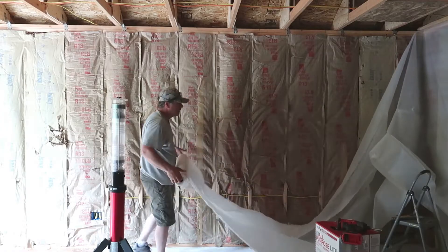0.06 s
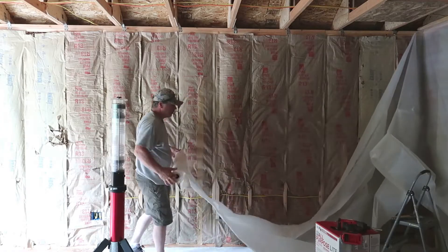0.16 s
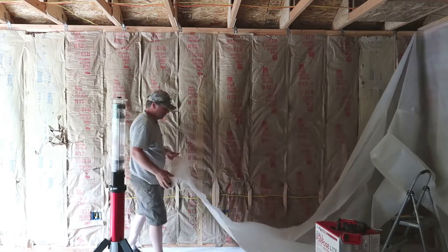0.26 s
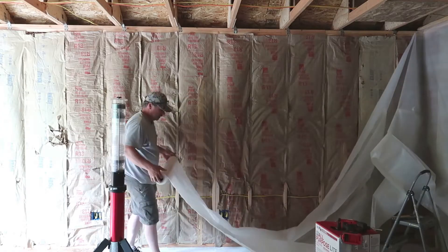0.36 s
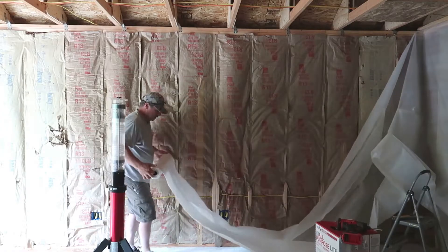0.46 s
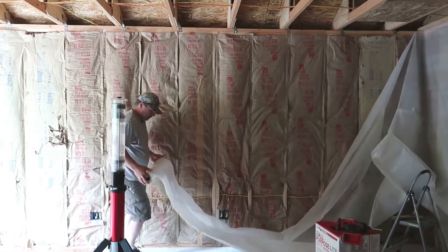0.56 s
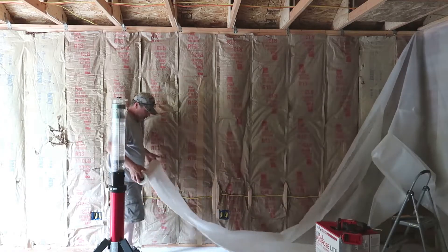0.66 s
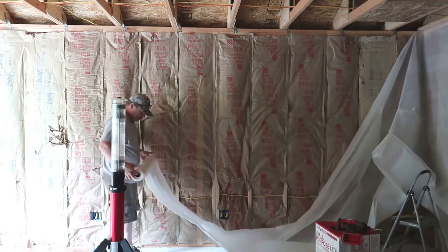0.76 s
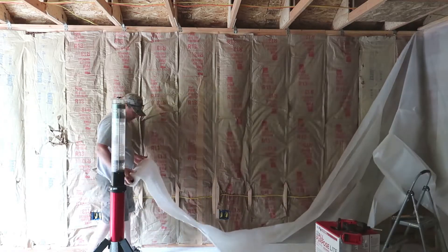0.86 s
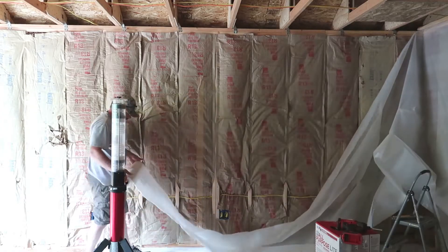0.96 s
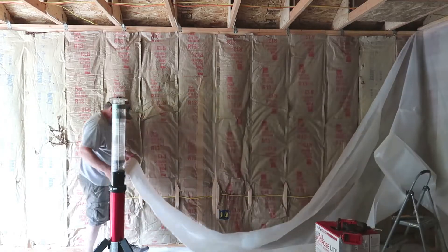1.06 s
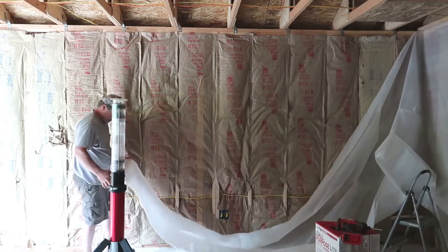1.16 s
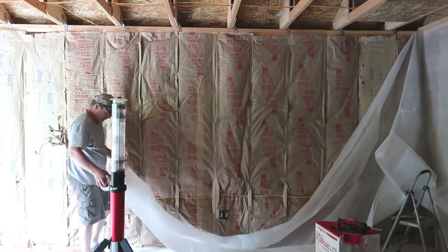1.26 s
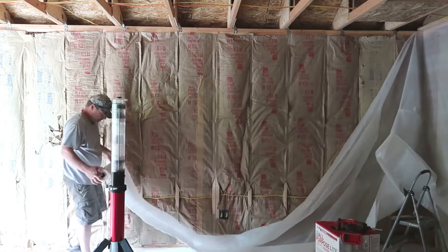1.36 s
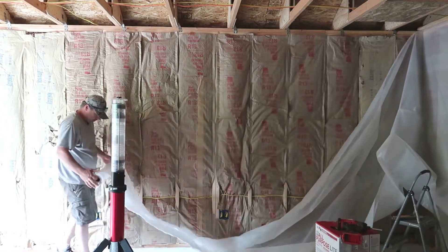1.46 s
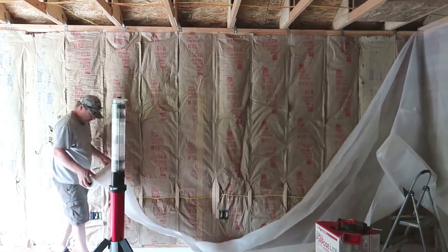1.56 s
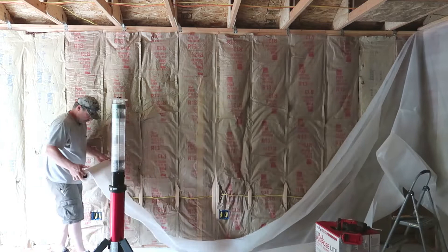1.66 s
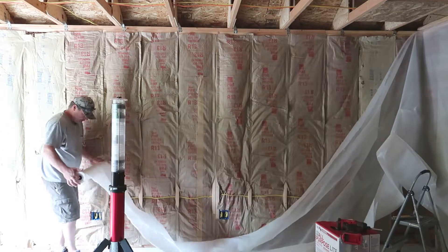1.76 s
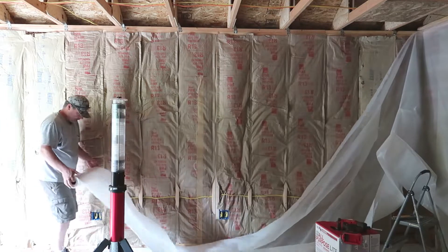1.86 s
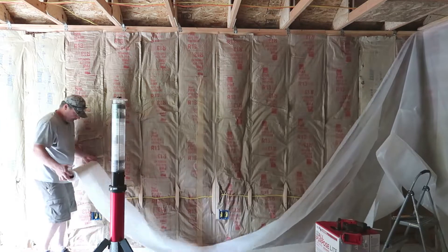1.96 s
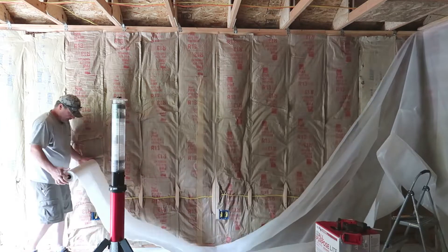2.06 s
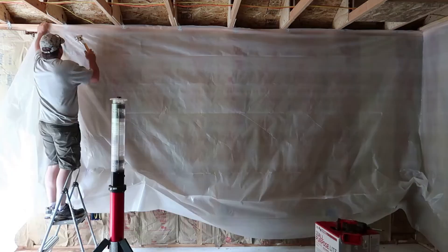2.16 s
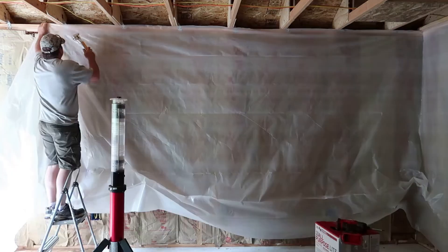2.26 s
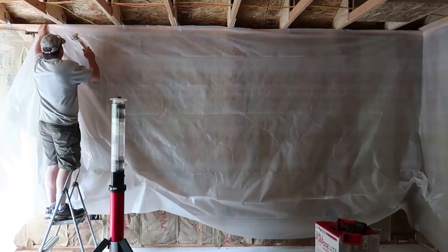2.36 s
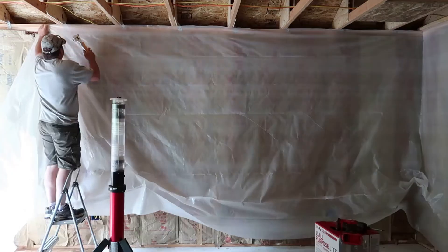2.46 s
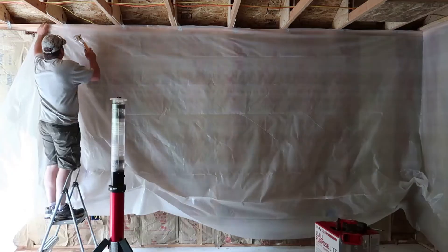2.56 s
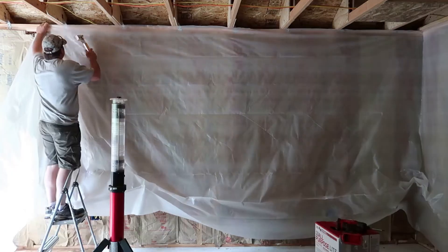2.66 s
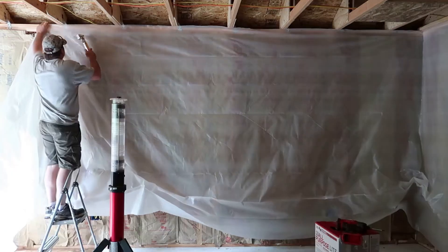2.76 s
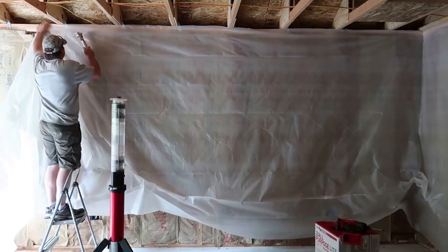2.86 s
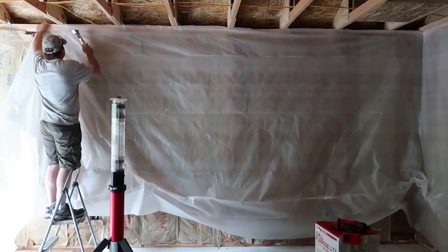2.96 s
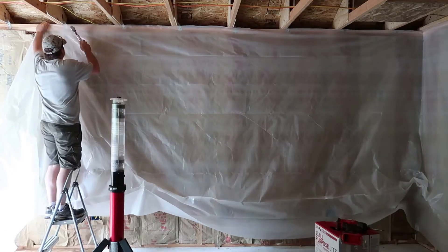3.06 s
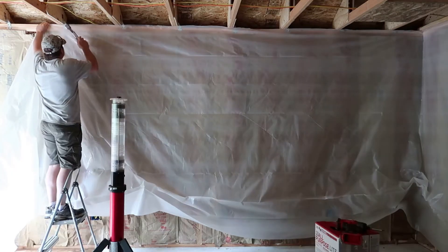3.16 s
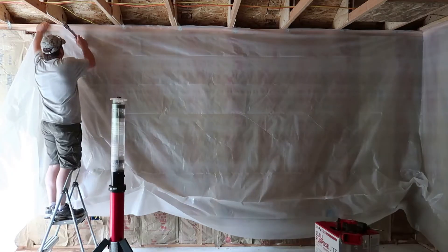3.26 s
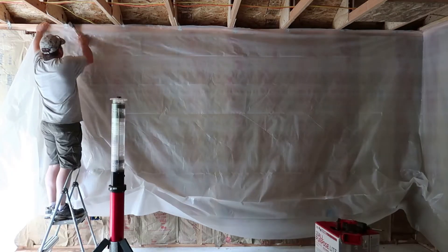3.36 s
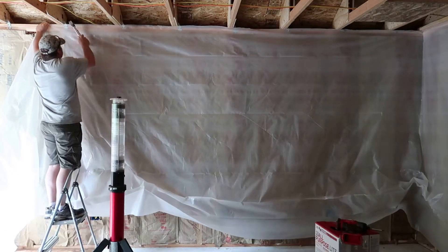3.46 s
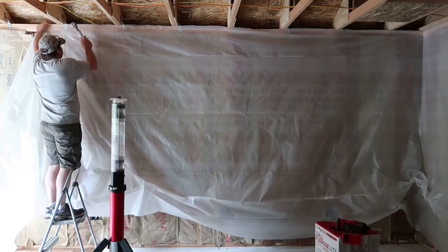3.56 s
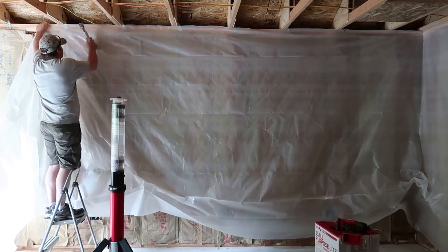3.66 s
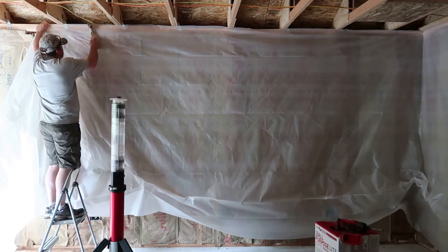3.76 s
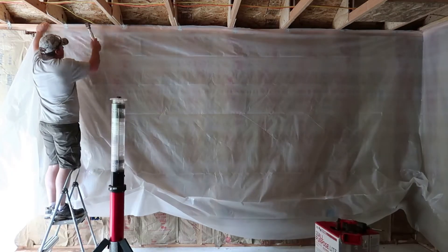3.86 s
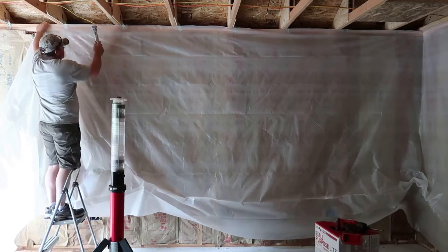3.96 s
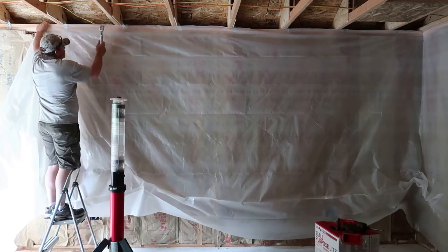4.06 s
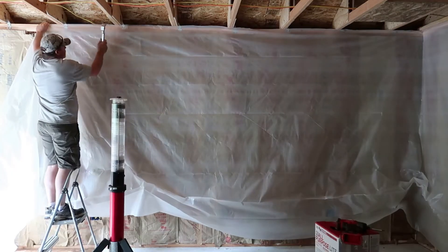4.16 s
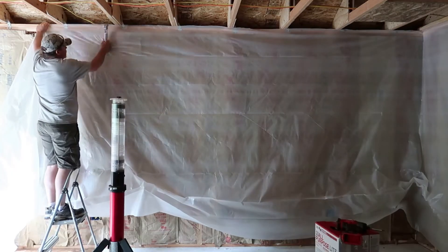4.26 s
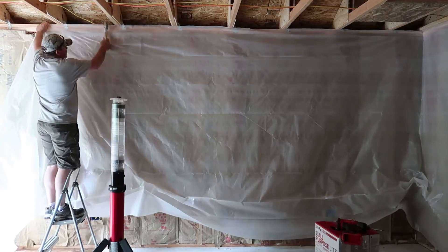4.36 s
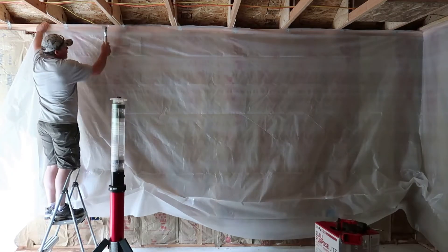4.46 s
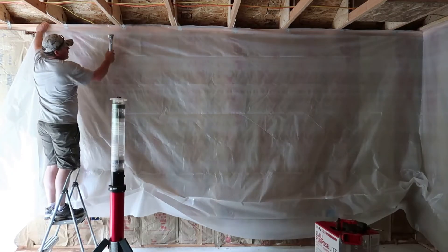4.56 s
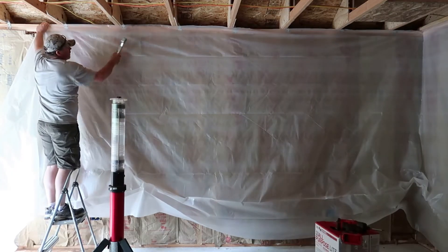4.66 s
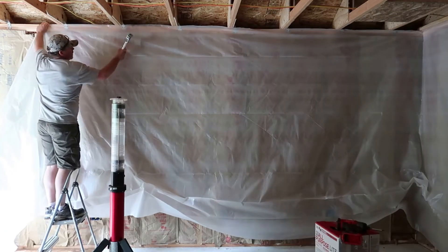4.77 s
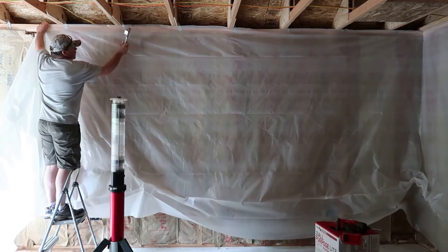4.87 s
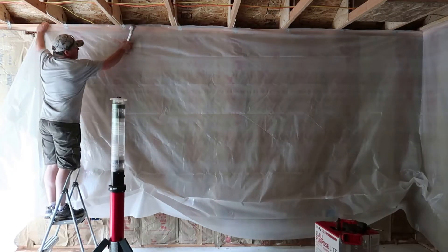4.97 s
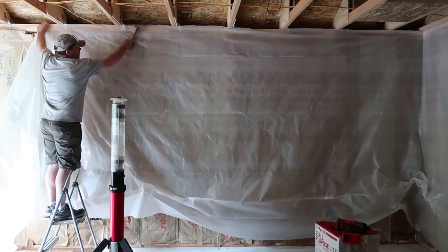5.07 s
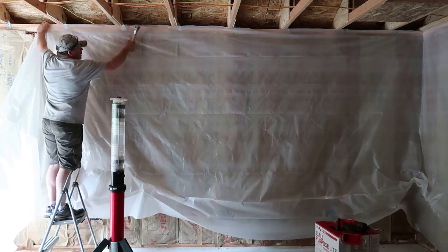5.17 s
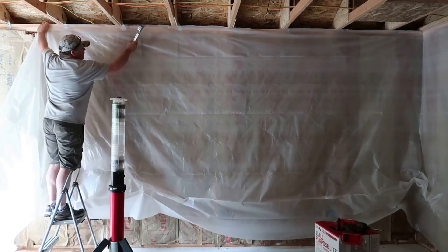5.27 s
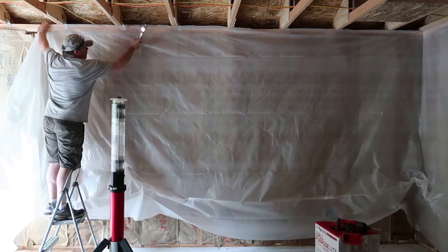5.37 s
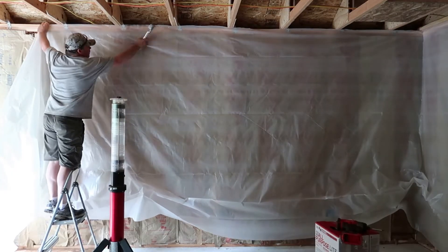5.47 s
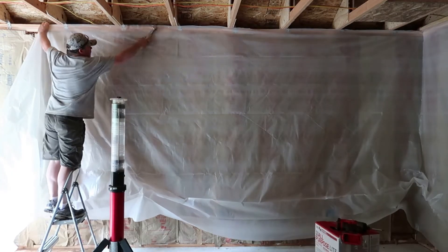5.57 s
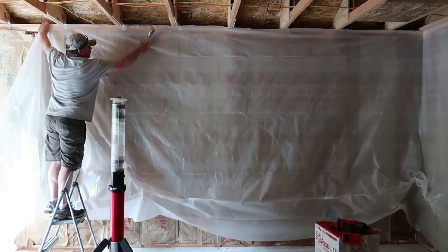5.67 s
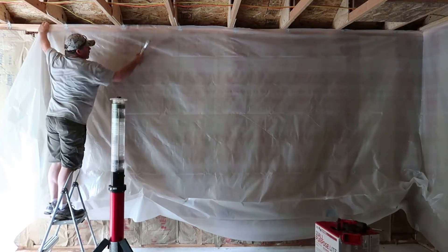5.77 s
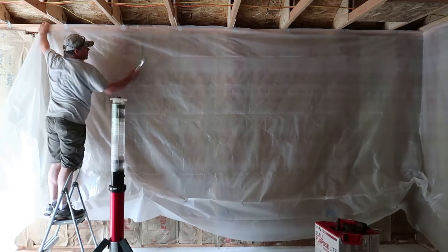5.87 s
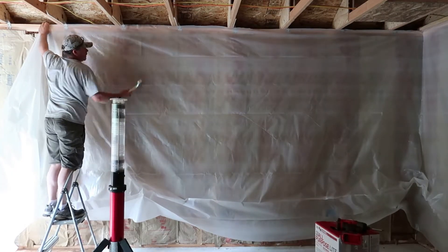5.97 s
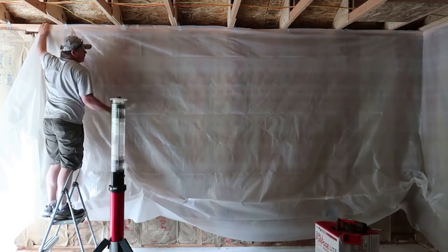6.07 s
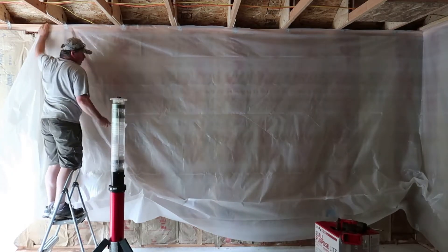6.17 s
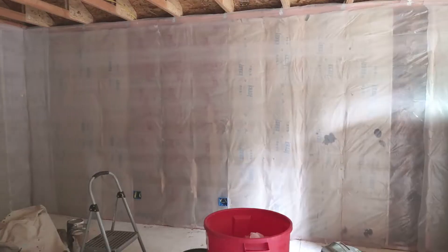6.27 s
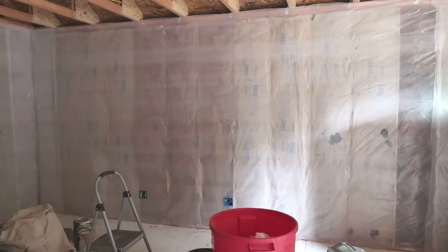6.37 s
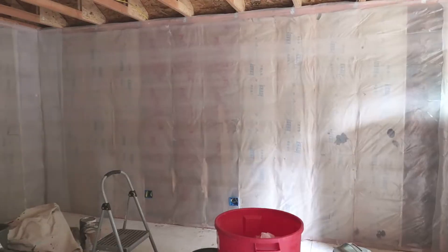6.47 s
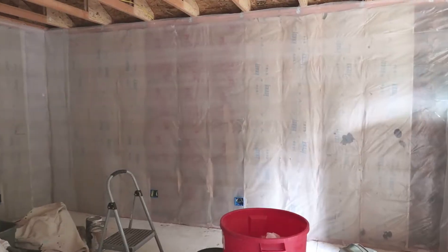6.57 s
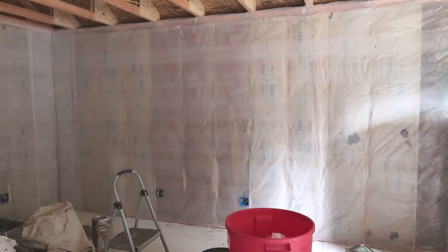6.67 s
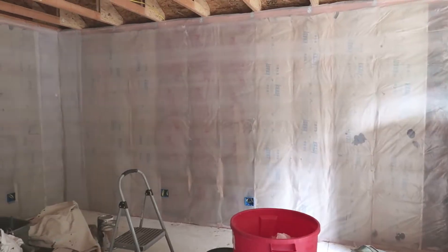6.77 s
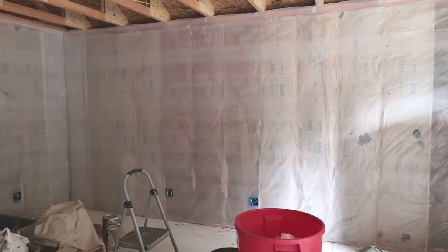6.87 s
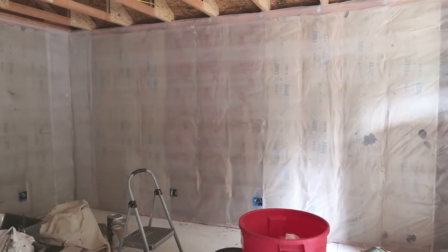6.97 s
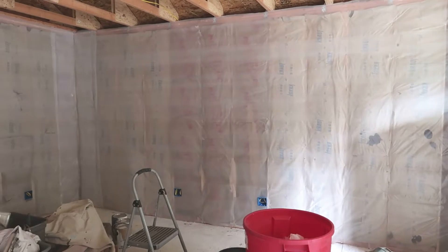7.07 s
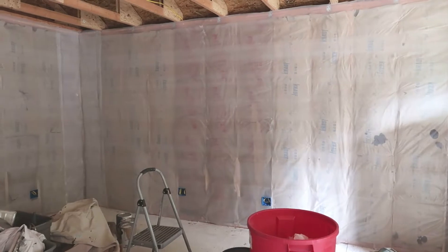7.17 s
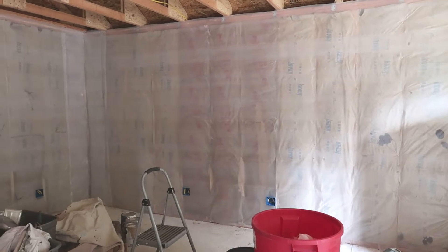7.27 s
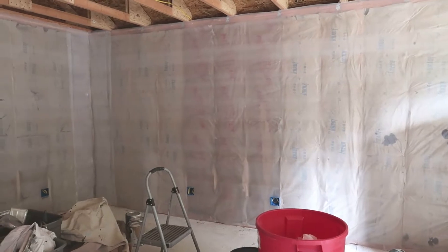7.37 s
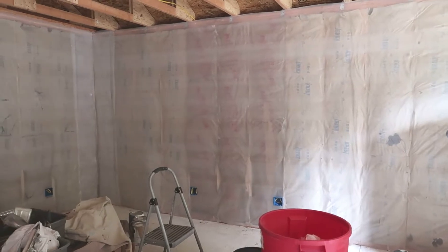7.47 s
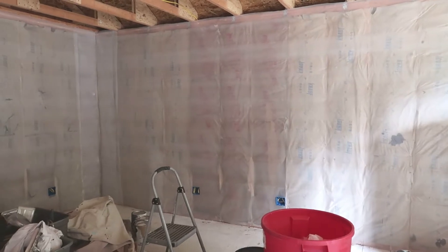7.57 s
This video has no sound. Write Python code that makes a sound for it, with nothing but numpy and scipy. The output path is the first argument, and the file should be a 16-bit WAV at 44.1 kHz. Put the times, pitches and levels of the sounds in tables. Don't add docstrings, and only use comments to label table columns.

```python
import sys
import numpy as np
from scipy import signal
from scipy.io import wavfile
from scipy.ndimage import uniform_filter1d

SR = 44100
rng = np.random.default_rng(int(sys.argv[2]) if len(sys.argv) > 2 else 0)


def dump_mix(stems):
    frames = np.atleast_2d(stems).T
    limited = np.clip(frames, -1, 1)
    pcm = np.round(limited * 32767).astype(np.int16)
    wavfile.write(sys.argv[1], SR, pcm)


def elevation(decibels):
    levels = np.asarray(decibels, float)
    return 10 ** (levels / 20)


N = 336042
MOVE_S = 6.207
CUTOFF_HZ = 15900

# t/s, peak level/dB, crack level/dB re peak, brush before the blow/s, echo level/dB re peak
STAPLER_BLOWS = [
    (3.419, 0, -15, 0.038, -20),
    (3.809, -8.5, -18, 0.02, -15.5),
    (4.384, -9.5, -18, 0.046, -14),
    (5.095, -7, -15.5, 0.053, -14),
    (5.589, -8, -15.5, 0.045, -12),
]
# f/Hz, t60/s
REVERBERATION = [(60, 0.7), (160, 0.22), (420, 0.27), (1100, 0.22), (2910, 0.39), (7680, 0.39)]
# f/Hz, correlation
ROOM_CORRELATION = [(60, .999), (200, 1), (700, .98), (2400, .85), (4400, 0.4), (7000, 0.25), (15000, 0.32)]


def rms_one(x):
    return x / np.sqrt(np.mean(x ** 2) + 1e-20)


def at_hz(points, hz):
    points = np.array(points)
    return np.interp(np.log(hz), np.log(points[:, 0]), points[:, 1])


def drift(rate, size):
    r = np.exp(-80 * np.pi * rate / SR)
    noise = rng.standard_normal(size // 40 + 2002)
    slow = signal.lfilter([1], [1, -2 * r, r * r], noise)[2000:]
    return np.interp(np.arange(size) / 40, np.arange(len(slow)), rms_one(slow))


def ring(clicks, hz, t60):
    r, w = elevation(-60 / (t60 * SR)), 2 * np.pi * hz / SR
    return signal.lfilter([0, np.sin(w)], [1, -2 * r * np.cos(w), r * r], clicks + 1e-18)


def add(out, s, sound):
    i = round(s * SR)
    out[..., i:i + sound.shape[-1]] += sound[..., :N - i]


def hiss(size):
    return rng.standard_normal((2, 2, size))


def bank(source, spectrum, alike, shape, count=19):
    out, edges = 0, np.geomspace(22, 15930, count + 1)
    for k, (low, high) in enumerate(zip(edges, edges[1:])):
        hz = np.sqrt(low * high)
        if spectrum[0][0] < high and low < spectrum[-1][0]:
            band_filter = signal.butter(2, [low, high], "band", fs=SR, output="sos")
            mid, side = signal.sosfilt(band_filter, source[k % 2])
            c = np.clip(at_hz(alike, hz), -1, 1)
            stereo = np.sqrt(1 + c) * mid + np.sqrt(1 - c) * side * [[1], [-1]]
            out = out + elevation(at_hz(spectrum, hz)) * shape(hz) * stereo
    return rms_one(out)


def tugs(rows, t):
    s, db, rise, fall, bright_db = np.transpose(rows)[:, :, None]
    power = elevation(2 * db - 20 * np.maximum((s - t) / rise, (t - s) / fall))
    return power.sum(axis=0), (power * bright_db).sum(axis=0)


def sheet(per_s=2500, spread_db=3.0, smooth=1.0, patchy_db=2.0, clump_db=0.5):
    # f/Hz, density/dB per Hz
    crackle_spectrum = [(150, -33.5), (250, -5), (330, -9), (385, -6), (450, 1.5), (525, -5.5), (692, -2),
                        (2600, -3), (9390, -20.5), (12600, -27), (15500, -37.5)]
    # f/Hz, density/dB per Hz
    billow_spectrum = [(13, -36), (22, -8), (123, -1), (189, 0), (247, -11.5), (287, -8), (350, -3.5),
                       (460, -43.5), (770, -120)]
    # f/Hz, left-right correlation
    sheet_correlation = [(60, 1), (200, 0.9), (700, 0.99), (2400, 0.97), (4400, 0.66), (7000, 0.4),
                         (15000, 0.23)]
    # t/s, crackle level/dB, rise/s per 10 dB, fall/s per 10 dB, treble level/dB
    tugs_near = [(0.03, -40, 0.083, .09, -2), (0.195, -35, 0.071, .08, -3), (0.38, -40.5, 0.022, .1, 5),
                 (0.49, -32.5, 0.082, .07, -1), (0.7, -42.5, 0.044, .04, -2.5),
                 (0.8, -37, 0.091, .12, -0.5), (0.93, -43, 0.13, .15, 3.5), (1.14, -34.5, 0.09, .1, 0),
                 (1.31, -43, .02, .04, -6.5), (1.435, -33, 0.03, .11, 0), (1.57, -46, .1, .2, -4.5),
                 (1.77, -36.5, .07, .13, -1), (2.04, -38, 0.052, .18, 1)]
    tugs_far = [(2.22, -48, 0.093, 0.062, 1.5), (2.285, -49.5, 0.016, 0.094, 7),
                (2.44, -47.5, 0.11, 0.14, 5), (2.53, -46.5, 0.085, 0.35, 2.5), (2.8, -50, 0.022, 0.087, 0),
                (2.91, -51, 0.21, 0.1, 3), (3.07, -56.5, .15, 0.044, 0), (3.2, -65, 0.026, .05, 0),
                (3.258, -61.5, .008, .07, 8)]
    step_up_s = 2.112
    slide_db, slide_bright_db = -50.5, 0.5
    billow_db, billow_follows = -50, 0.55

    size = round(3.42 * SR)
    t, slide = np.arange(size) / SR, elevation(2 * slide_db)
    near, near_bright = tugs(tugs_near, t)
    far, far_bright = tugs(tugs_far, t)
    is_near = t < step_up_s
    power = np.where(is_near, near + slide, far)
    crackle_db = 10 * np.log10(power)
    tilt_db = np.where(is_near, near_bright + slide * slide_bright_db, far_bright) / power

    born = rng.random(size) < per_s * elevation(4 * drift(25, size)) / SR
    heights = elevation(spread_db * np.minimum(rng.exponential(1, size), 5))
    clicks = rms_one(born * heights * rng.choice([-1, 1], size))
    source = clicks * [[1], [-.3]] + smooth * hiss(size) * [[1], [1.5]]
    clumps = drift(39, size)

    def shape(hz):
        treble = np.clip(np.log2(hz / 2500), 0, 1)
        return elevation(clump_db * clumps + patchy_db * drift(15.0, size) + tilt_db * treble)

    def billow_shape(hz):
        return elevation(3 * drift(15, size))

    crackle = elevation(crackle_db + 1.5) * bank(source, crackle_spectrum, sheet_correlation, shape, count=32)
    billow = bank(hiss(size), billow_spectrum, sheet_correlation, billow_shape)
    out = np.zeros((2, N))
    add(out, 0, crackle + elevation(billow_db + billow_follows * (crackle_db + 43)) * billow)
    return out


def small_hits(rows, cycles, crack_s, crack_db):
    out, t = np.zeros(N), np.arange(round(.08 * SR)) / SR
    for s, db, hz, *bright_db in rows:
        burst = rng.standard_normal(len(t)) * np.exp(-t / crack_s)
        body = ring(burst, hz, cycles / hz)
        crack = elevation(crack_db + sum(bright_db)) * np.diff(burst, prepend=0)
        add(out, s, elevation(db) * (body / np.abs(body).max() + crack))
    return out


def snaps():
    # t/s, peak level/dB, f/Hz
    fold_pops = [
        (0.153, -28.5, 1730),
        (0.367, -35, 466),
        (0.675, -26.5, 1680),
        (0.697, -25.5, 506),
        (1.299, -33, 950),
        (1.424, -44, 785),
        (1.94, -31, 806),
        (2.28, -37.5, 1310),
    ]
    return small_hits(fold_pops, cycles=5.9, crack_s=0.0015, crack_db=-18.5)


def room(x, first_s=0.0024):
    # f/Hz, level/dB
    echo_colour = [(100, -9), (300, -5.5), (800, 1.5), (3000, -0.5), (8000, 6.5), (15000, -12)]
    t = np.arange(round(.8 * SR)) / SR

    def shape(hz):
        return elevation(-60 * t / at_hz(REVERBERATION, hz)) * np.clip(t / first_s - 1, 0, 1)

    echoes = bank(hiss(len(t)), echo_colour, ROOM_CORRELATION, shape) / np.sqrt(len(t))
    return signal.fftconvolve(x[None], echoes, axes=1)[:, :N]


def flaps():
    # t/s, peak level/dB, f/Hz, swell/s
    sheet_flaps = [
        (0.185, -36.5, 158, 0.018),
        (0.905, -30.5, 120, 0.012),
        (0.962, -32, 89.5, 0.017),
        (1.522, -37, 123, 0.018),
        (1.576, -36.5, 98, .015),
        (1.615, -38, 41.6, 0.022),
    ]
    foot_nudges = [
        (2.811, -43, 144, 0.018),
        (3.222, -51, 95, 0.011),
        (4.778, -60, 150, .024),
        (5.301, -62, 150, 0.02),
    ]
    out = np.zeros(N)
    for s, db, hz, swell in sheet_flaps + foot_nudges:
        t = np.arange(round(6 * swell * SR)) / SR
        envelope = (t / swell * np.exp(1 - t / swell)) ** 2
        add(out, s, elevation(db) * envelope * np.sin(2 * np.pi * hz * t * (1.1 - 0.038 * t / swell)))
    return out


def creak(per_s=110):
    # centre t/s, length/s, f/Hz, level/dB, t60/s
    slip_runs = [(2.798, 0.018, 1420, -42, .035), (2.808, 0.028, 1235, -41.5, 0.04),
                 (2.848, 0.019, 2690, -37, 0.023), (2.862, 0.021, 1276, -42, 0.039),
                 (2.866, 0.012, 1490, -39, 0.026), (2.875, 0.035, 2130, -44, 0.034),
                 (2.915, 0.023, 1651, -38, 0.04), (2.92, 0.025, 3350, -47, 0.015),
                 (2.949, 0.015, 1175, -44.5, 0.035), (3.03, 0.043, 1580, -55, 0.013),
                 (3.05, 0.04, 753, -50, 0.018), (5.858, 0.04, 1476, -64, 0.05),
                 (5.96, 0.038, 1550, -72, 0.04), (6.05, 0.03, 1600, -66, 0.04)]
    t = np.arange(N) / SR
    phase = np.cumsum(per_s * elevation(3.4 * drift(30, N))) / SR
    slips = (np.diff(np.floor(phase), prepend=0) > 0) * elevation(2.1 * rng.standard_normal(N))
    out = np.zeros(N)
    for s, length, hz, db, t60 in slip_runs:
        near = slice(round((s - .2) * SR), round((s + .3) * SR))
        load = np.exp(-((t[near] - s) / length) ** 2)
        out[near] += elevation(db) * ring(slips[near] * load, hz, t60)
    return out


def room_tone():
    # f/Hz, density/dB per Hz
    ladder_spectrum = [(13, -30), (22, -1), (70, -1.5), (239, -9), (1280, -21), (1590, -10), (1820, -32),
                       (2680, -16), (3070, -20.5), (15500, -36)]
    # f/Hz, density/dB per Hz
    last_spectrum = [(13, -42), (22, -17.5), (44, -5), (70, -5), (102, -7.5), (172, -6), (342, -6.5),
                     (560, -13), (1050, -15.5), (6620, -32), (9460, -37), (12800, -41), (15500, -59)]
    # f/Hz, left-right correlation
    last_correlation = [(60, 1), (130, 0.46), (290, -0.17), (640, -0.28), (1410, -0.17), (3100, 0.091),
                        (6820, 0.55), (15000, 0.97)]
    # f/Hz, rms level/dB
    mains = [(49, -67.5), (100, -64.5), (149, -66.5)]
    # t/s, level/dB
    gain = [(3.1, -86), (3.2, -69), (3.45, -67), (3.77, -75), (4.3, -76), (5.05, -74), (5.55, -71.5),
            (6.0, -69), (6.19, -65)]
    shudder_db, shudder_s = 24.5, 0.18
    last_db = -57.5

    out, start, move = np.zeros((2, N)), round(3.1 * SR), round(MOVE_S * SR)
    t = np.arange(N) / SR
    gain_s, gain_db = np.transpose(gain)
    since = t - np.array(STAPLER_BLOWS)[:, :1]
    shudder = np.where(since > 0, np.exp(-np.abs(since) / shudder_s), 0).max(axis=0)
    ducked_db = np.interp(t, gain_s, gain_db) + shudder_db * shudder

    def near_shape(hz):
        return elevation(1.8 * drift(6.9, move - start))

    def last_shape(hz):
        return elevation(1.0 * drift(5.7, N - move))

    near = bank(hiss(move - start), ladder_spectrum, ROOM_CORRELATION, near_shape)
    out[:, start:move] = elevation(ducked_db[start:move] + 1.0) * near
    last = bank(hiss(N - move), last_spectrum, last_correlation, last_shape)
    hum = sum(elevation(db + 0.5) * np.sin(2 * np.pi * hz * t[:N - move]) for hz, db in mains)
    out[:, move:] = elevation(last_db) * last + hum
    return out


def ticks():
    # t/s, peak level/dB, f/Hz, treble level/dB re peak
    strain_ticks = [
        (3.254, -49, 1620, -11.5),
        (4.144, -59, 4035, -4.5),
        (4.755, -55.5, 3560, -6),
        (4.783, -57, 832, -16),
        (4.896, -78, 4570, -3),
        (5.488, -53, 3110, -24),
        (6.008, -52, 4900, -22.5),
        (6.045, -52.5, 1594, -17),
        (6.142, -48, 2190, -18.5),
        (6.175, -52, 6440, -4.5),
    ]
    return small_hits(strain_ticks, cycles=3, crack_s=.01, crack_db=-0.5)


def stapler(rattle_per_s=1500, brush_db=-27, build_s=0.0038):
    # f/Hz, density/dB per Hz
    knock_spectrum = [(35, -50.5), (60, -26.5), (215, -8), (359, -11), (657, -9), (953, -13), (1380, -8),
                      (1590, -15), (1910, -11.5), (4520, -21.5), (9300, -24), (13200, -24.5), (15500, -34)]
    # f/Hz, density/dB per Hz
    echo_spectrum = [(24, -45), (45, -13.5), (170, -2), (294, -10), (359, -16), (637, -10.5), (758, -13.5),
                     (1020, -14), (1820, -18.5), (2390, -18.5), (3930, -24.5), (12700, -27), (15500, -49)]
    # thud level/dB, thud f/Hz, knock f/Hz, knock level/dB re thud, upper knock f/Hz
    stud_answers = [(-13.5, 260, 686, 7, 950), (-11, 227.2, 700, -3.5, 446), (-13.5, 237, 549, 0, 791),
                    (-20, 144.4, 554, -1, 1700), (-16, 290, 640, -2, 500)]
    wall_hz, wall_db, wall_t60_s = 91, -14, 0.33
    contact_s, late_cycles = .011, 1.3

    out, lead = np.zeros((2, N)), round(.06 * SR)
    t = (np.arange(round(.55 * SR)) - lead) / SR
    after, before = np.maximum(t, 0), np.minimum(t, 0)
    for blow, answer in zip(STAPLER_BLOWS, stud_answers):
        s, db, crack_db, brush_s, echo_db = blow
        thud_db, thud_hz, knock_hz, knock_db, upper_hz = answer
        impacts = 1.0 * (rng.random(len(t)) < rattle_per_s / SR)
        rattle = 1 + 3.3 * uniform_filter1d(impacts, size=30) * 30
        contact = (t >= 0) * rattle * np.exp(-(after / contact_s) ** 3.3) / 9.4
        brush = (t > -brush_s) * elevation(brush_db) * np.exp(before / (0.46 * brush_s))
        approach = (t < 0) * (brush + 0.22 * np.exp(before / 0.0036))
        push = hiss(len(t)) * (contact + approach)

        def bright(hz):
            return elevation((crack_db + 17.5) * np.clip(np.log2(hz / 2500), 0, 1))

        def fading(hz):
            rise = 1 - np.exp(-after / (build_s * (500 / hz) ** 1.2))
            decay_db = -60 * (after - .05) / at_hz(REVERBERATION, hz)
            return bright(hz) ** 0.29 * rise * elevation(decay_db + 1.5 * drift(40, len(t)))

        knock = bank(push, knock_spectrum, ROOM_CORRELATION, bright)
        strike = push[0, 0] * (t > -0.004)
        modes = [(thud_hz, thud_db, .09), (knock_hz, thud_db + knock_db, .08),
                 (upper_hz, thud_db + knock_db - 2, .06), (wall_hz, thud_db + wall_db, wall_t60_s)]
        stud = 0
        for hz, mode_db, t60 in modes:
            mode = ring(np.roll(strike, round(late_cycles * SR / hz)), hz, t60)
            stud = stud + elevation(mode_db - 1.0) * mode / np.abs(mode).max()
        echoes = bank(hiss(len(t)), echo_spectrum, ROOM_CORRELATION, fading)
        direct = elevation(db + 1.5) * knock / np.abs(knock).max()
        add(out, s - lead / SR, direct + stud + elevation(db + echo_db - 11.5) * echoes)
    return out


def holes(x, share_per_octave=.5, lift_db=1.5, size=1024):
    edge_hz = 8000
    hz, s, cells = signal.stft(x, SR, nperseg=2 * size, noverlap=size)
    for low in np.arange(edge_hz, CUTOFF_HZ, 500):
        octaves = np.log2(1.1 * low / edge_hz)
        chance = np.repeat(rng.random(len(s)), 2)[:len(s)]
        kept = chance > share_per_octave * octaves ** 2 * (s < MOVE_S)
        cells[:, (hz >= low) & (hz < low + 500)] *= kept * elevation(lift_db * octaves ** 4)
    return signal.istft(cells, SR, nperseg=2 * size, noverlap=size)[1][:, :N]


def starved_side(x, keep_db=-70, chance_db=9.5, size=1024):
    edge_hz = 6900
    mid, side = (x[0] + x[1]) / 2, (x[0] - x[1]) / 2
    hz, _, cells = signal.stft(side, SR, nperseg=2 * size, noverlap=size)
    frames = cells.shape[1]
    for low in np.arange(edge_hz, 20000, 700):
        band = (hz >= low) & (hz < low + 700)
        power = np.mean(np.abs(cells[band]) ** 2, axis=0)
        level_db = 10 * np.log10(power + 1e-20) + 3.0 * np.log2(low / edge_hz)
        chance = np.repeat(rng.standard_normal(frames), 2)[:frames]
        cells[band] *= level_db + chance_db * chance > keep_db
    side = signal.istft(cells, SR, nperseg=2 * size, noverlap=size)[1][:N]
    return np.array([mid + side, mid - side])


def scene():
    small = snaps() + ticks() + creak()
    before_move = np.arange(N) < MOVE_S * SR
    contacts = before_move * (small + room(elevation(2.0) * small))
    blows = stapler() * elevation([[.08], [-.08]])
    return sheet() + contacts + flaps() + room_tone() + blows


def band_limit(x):
    return signal.sosfilt(signal.butter(12, 15960, fs=SR, output="sos"), x)


def record(dry):
    rounded = 0.6 * np.tanh(dry / 0.69)
    cut = signal.sosfilt(signal.cheby2(14, 70, CUTOFF_HZ, fs=SR, output="sos"), rounded)
    cut = signal.sosfilt(signal.butter(2, 20, "high", fs=SR, output="sos"), cut)
    mix = starved_side(holes(cut))
    return band_limit(mix)


dry = scene()
out = record(dry)
dump_mix(out)
```